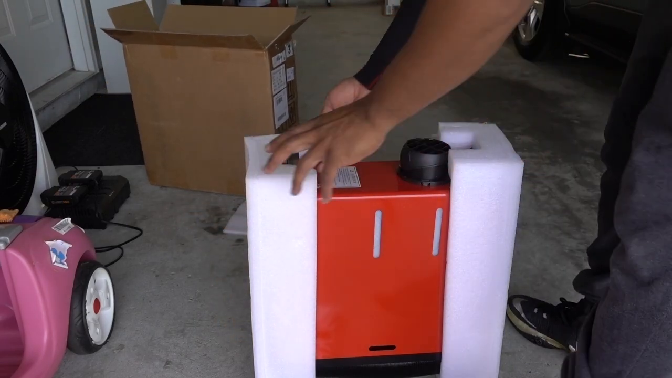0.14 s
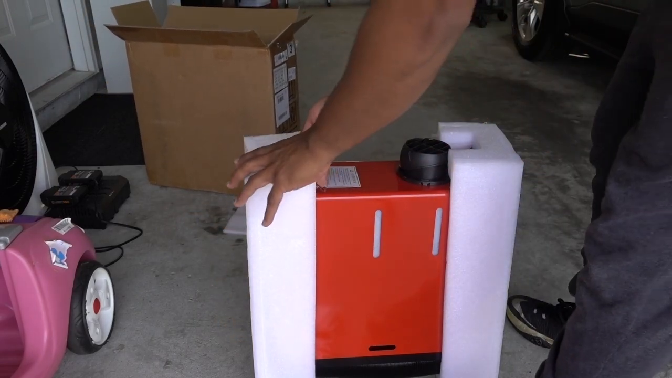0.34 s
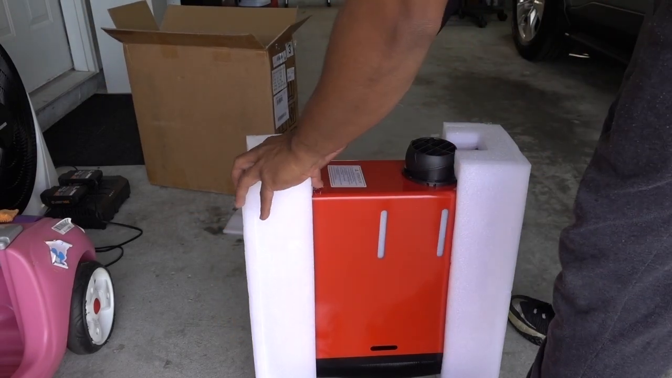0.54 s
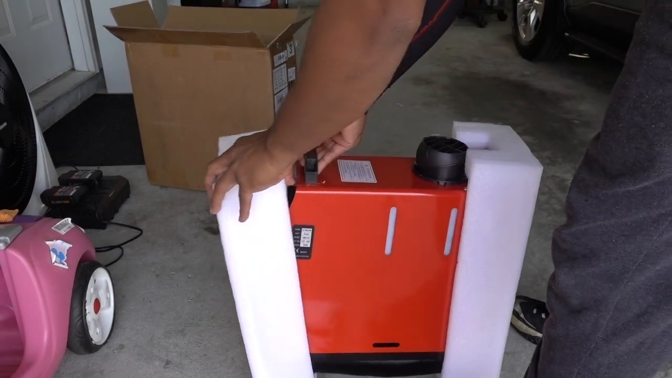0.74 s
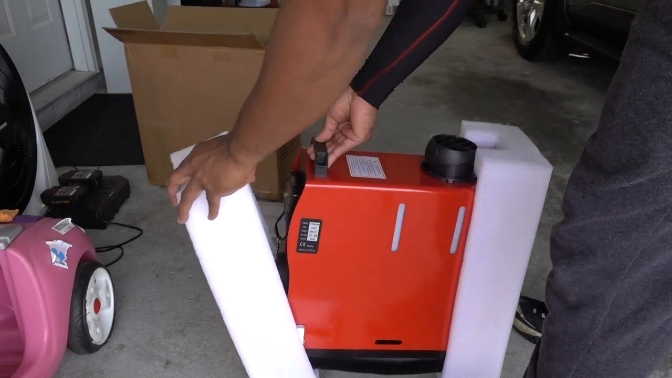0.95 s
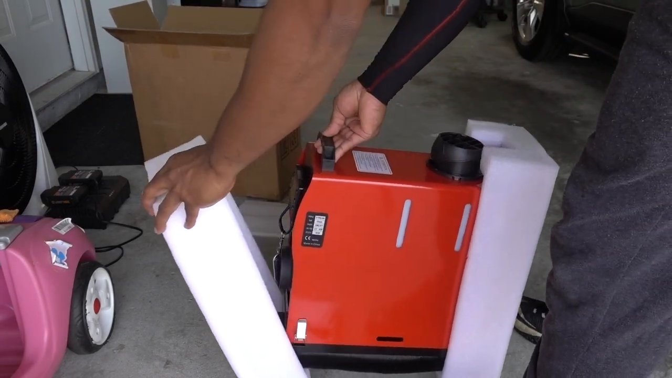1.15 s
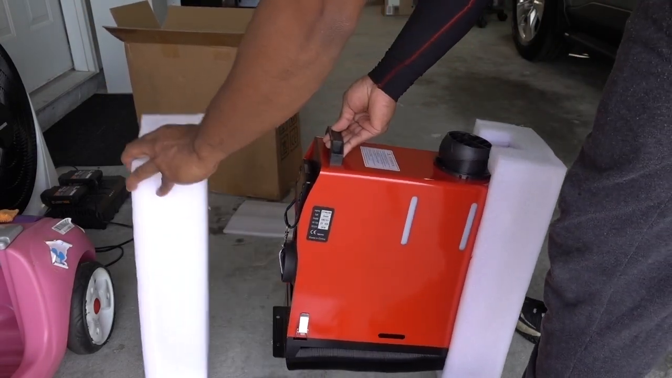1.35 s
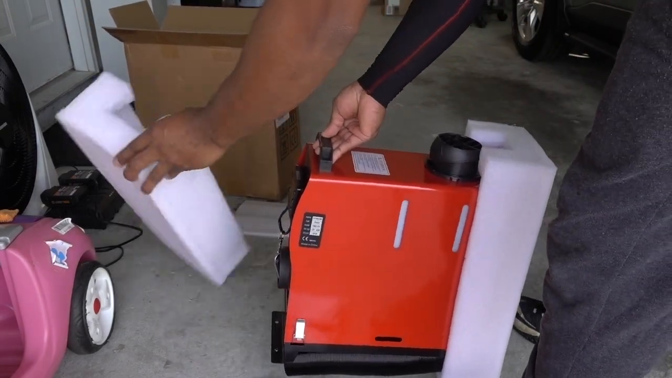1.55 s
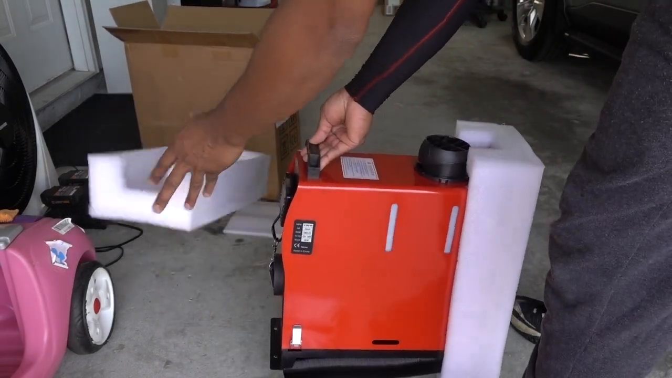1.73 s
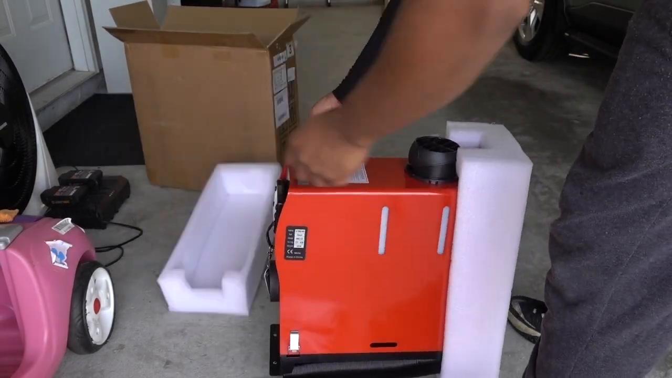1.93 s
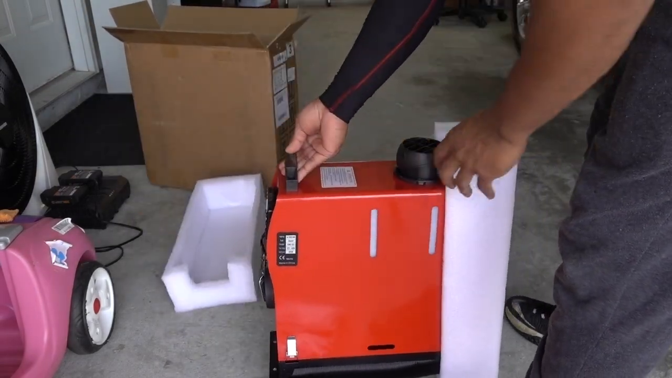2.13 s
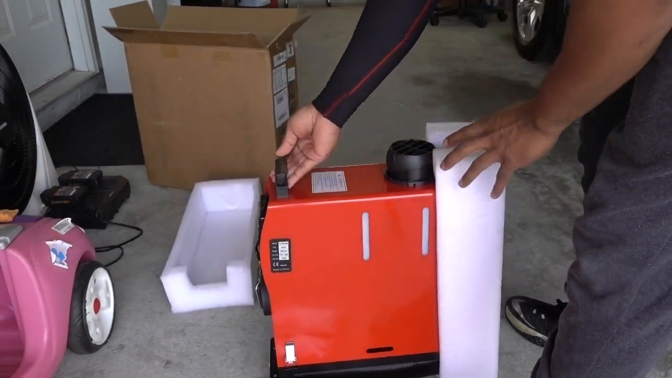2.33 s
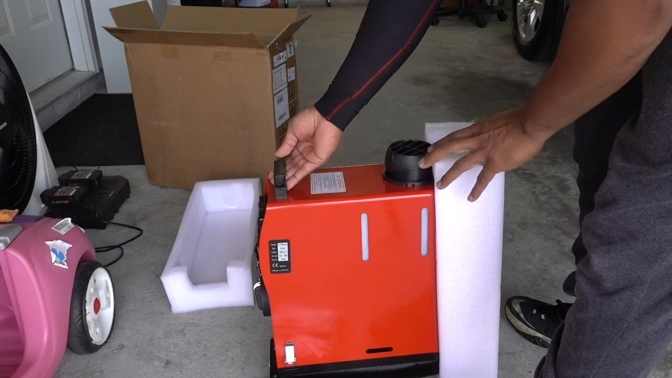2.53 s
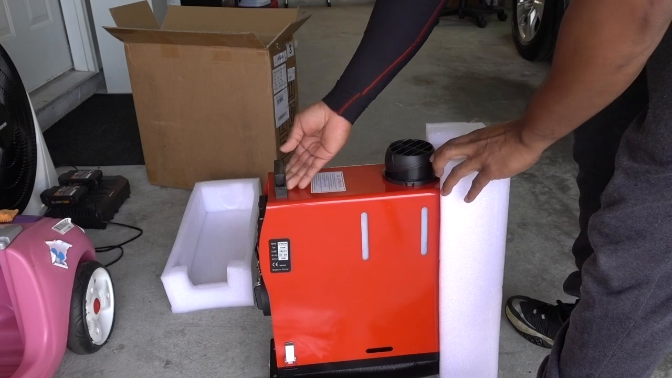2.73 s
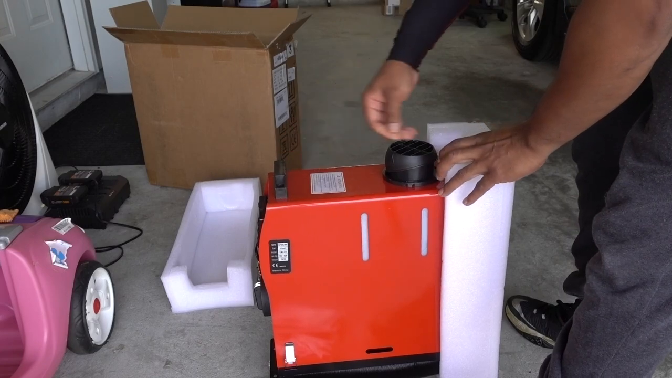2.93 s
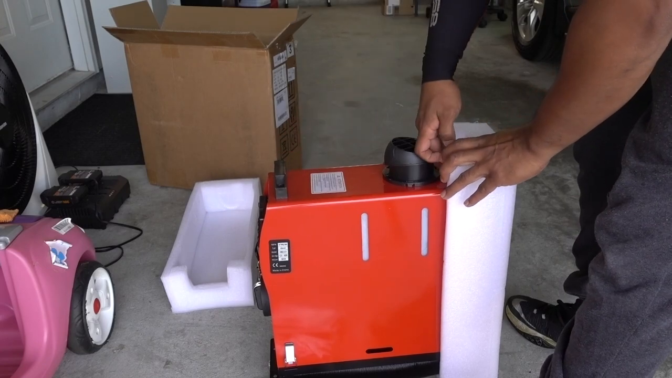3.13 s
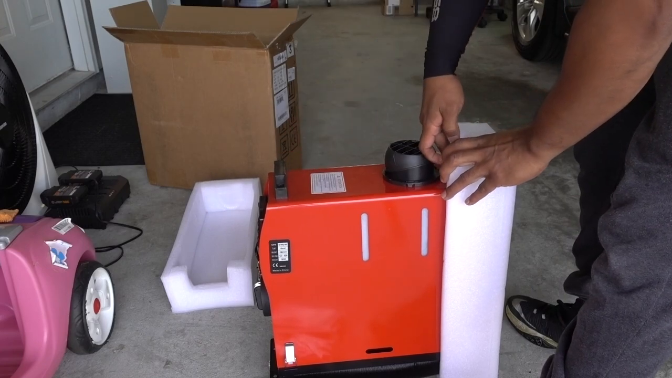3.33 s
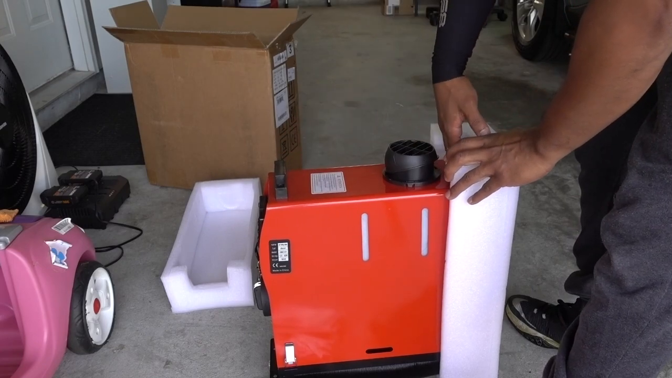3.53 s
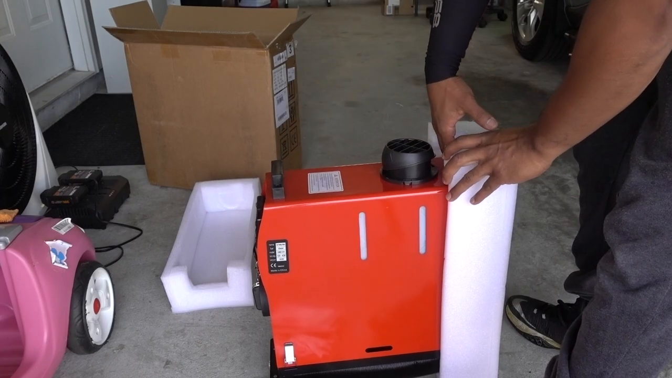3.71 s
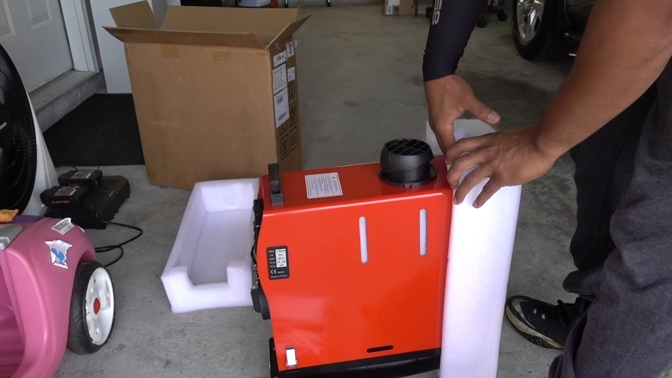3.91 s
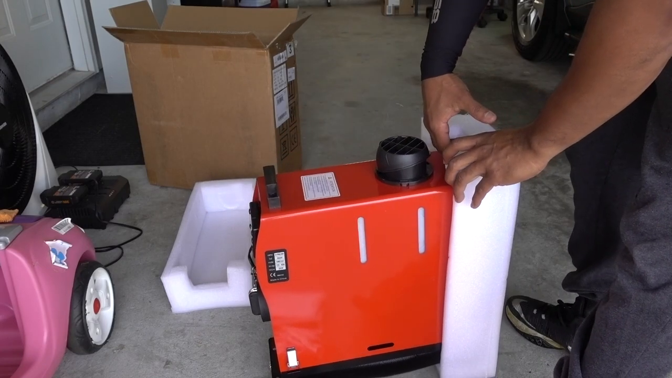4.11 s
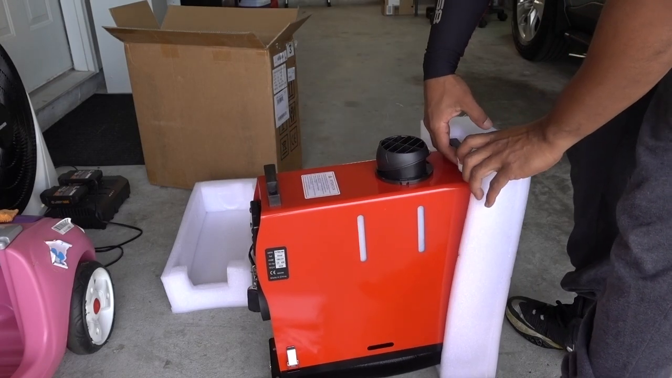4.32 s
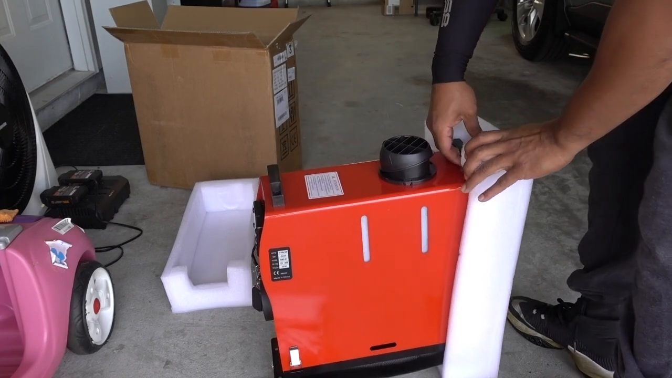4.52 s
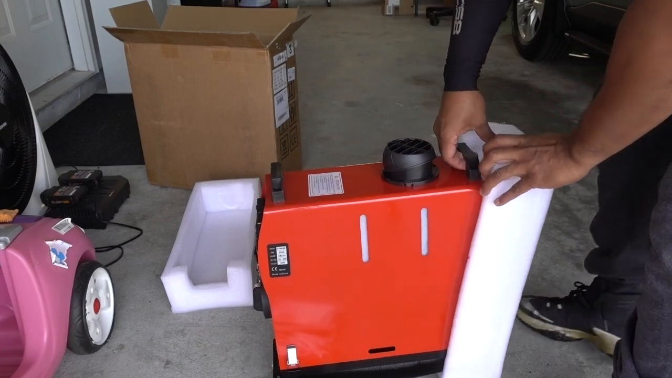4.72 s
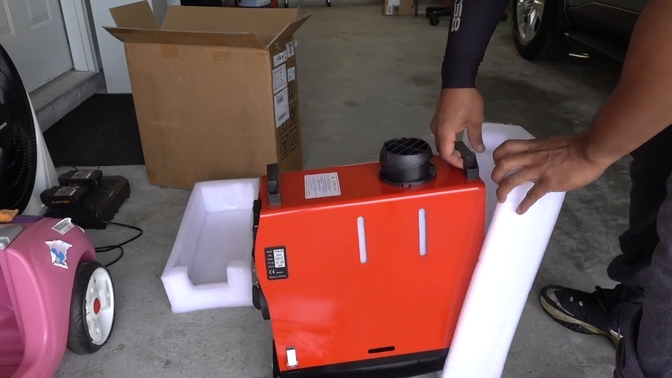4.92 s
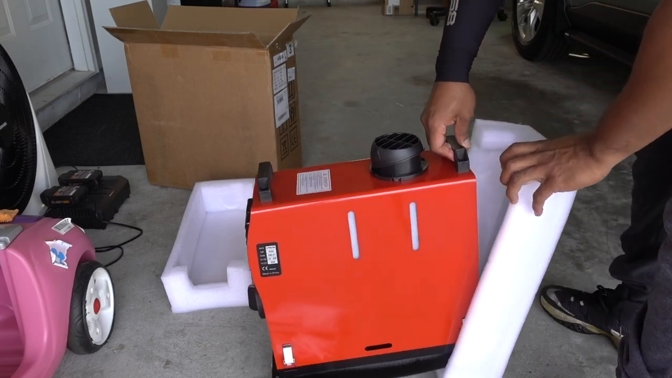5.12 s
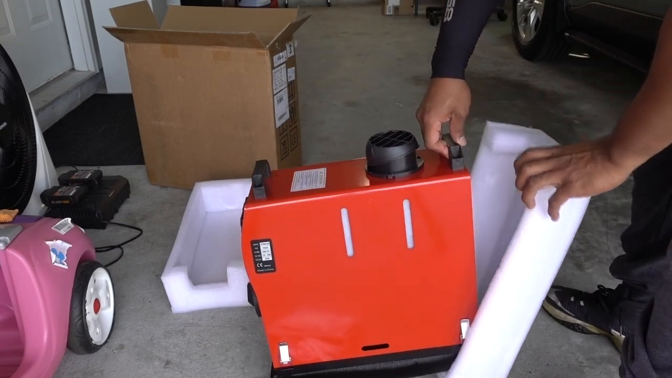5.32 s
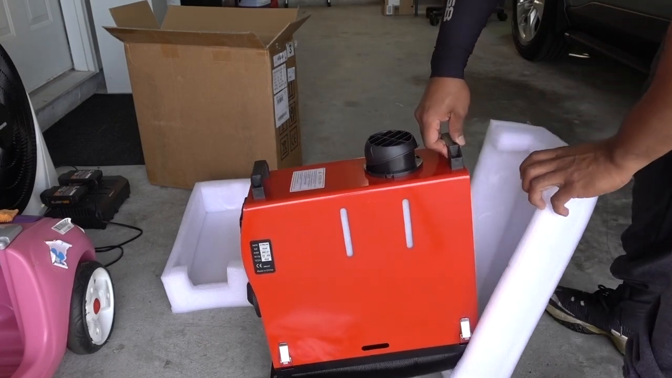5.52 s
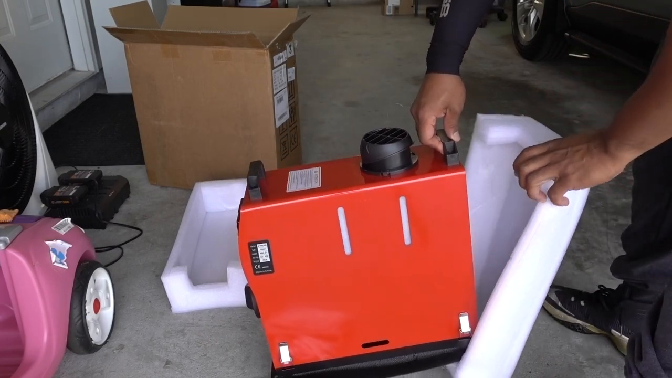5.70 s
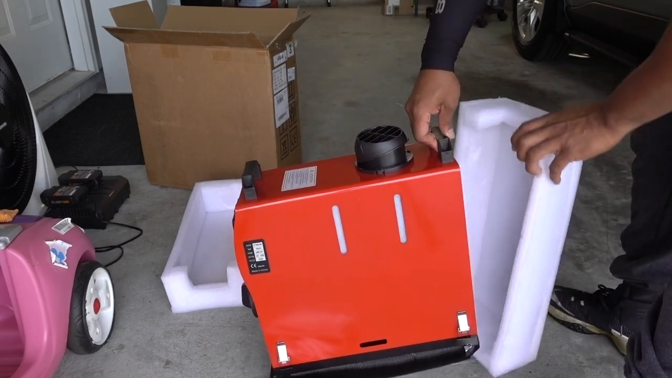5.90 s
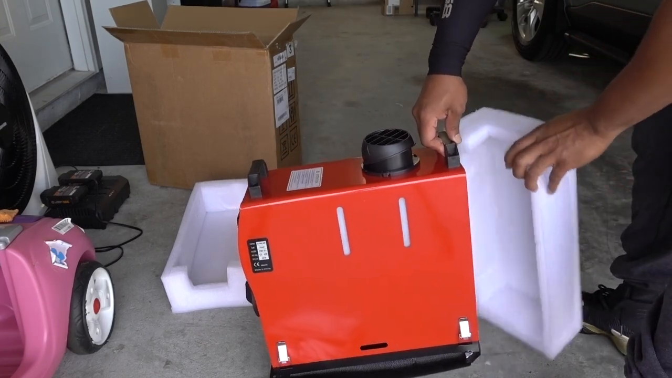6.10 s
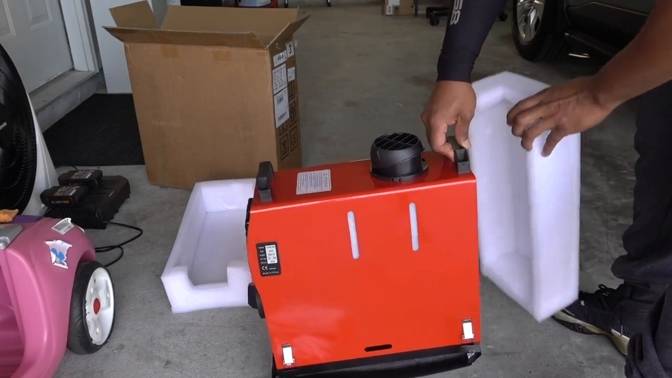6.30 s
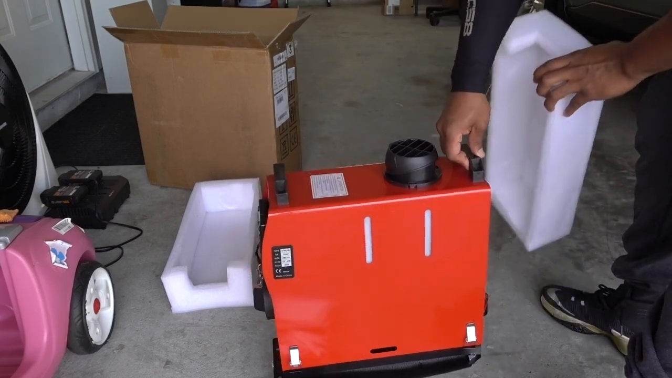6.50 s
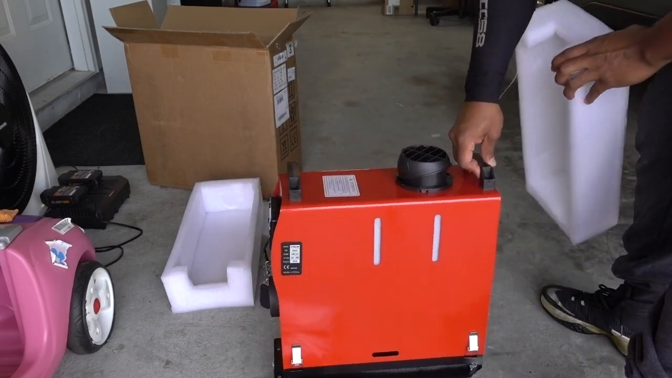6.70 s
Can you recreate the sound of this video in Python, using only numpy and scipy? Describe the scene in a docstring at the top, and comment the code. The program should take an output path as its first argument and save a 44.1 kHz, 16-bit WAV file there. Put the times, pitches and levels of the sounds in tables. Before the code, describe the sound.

Foam blocks are pulled off a sheet-metal casing, close to a stereo microphone. Faint rubs and taps open the sound. From about 0.7 to 1.3 seconds come loud, grainy, slightly squeaky scrapes, with the sharpest bump near 0.9. After a lull with one small scuff, knocks at 2 seconds make the casing ring briefly, and a loose fitting clacks near 2.4. Duller rubs and bumps follow from 3.1 to 3.5 seconds, then soft hissing friction and tiny ticks. Stronger scrapes return between 4.5 and 4.9 seconds. From 5 to 6.4 seconds the foam scuffs and knocks in a quick, uneven run, strongest around 6.1, ending with a small squeak and fading rubs. The hard-walled garage adds very short reflections, and a quiet, steady air rumble lies underneath throughout.

```python
"""Foam blocks off a metal casing

On a concrete garage floor, close to a stereo microphone, two foam blocks are worked off the ends of
a sheet-metal casing. The foam rubs in short grainy strokes that sound in its own dull body, hiss on
the paint and now and then squeak. Slips and bumps jolt the casing, which rings briefly, and a loose
fitting clacks. A hard room and a quiet air rumble lie behind."""
import sys
import numpy as np
from scipy import signal
from scipy.fft import rfft, irfft, next_fast_len
from scipy.io import wavfile

SR = 44100
rng = np.random.default_rng(int(sys.argv[2]) if len(sys.argv) > 2 else 0)


def store_wav(level_fs):
    """Save 16-bit WAV to argv[1]."""
    pcm = np.round(np.clip(np.atleast_2d(level_fs), -1, 1) * 32767)
    wavfile.write(sys.argv[1], SR, pcm.T.astype(np.int16))


N = 297675

# Rubbing strokes: peak_s, body_db, swell_s, fade_s, hiss_db, drum_db, pitch_hz, pitch_lift_db
# Swell and fade span 20 dB and last at least 22 and 4 ms; hiss and drum are relative to the body.
STROKES = [(0.002, -38.5, -0.5, 0.13, -7, -32, 2550, 38), (.455, -68.5, 0.24, -0.1, -11, 3.5, 1790, 2),
           (.5, -65, 0, -0.8, 6.5, -17, 2100, 1), (.535, -49.5, 0.16, 0.3, -4.5, -16, 2060, 7),
           (.63, -59, -0.2, 0.84, -9, -25, 2550, 15), (0.731, -33, 0.07, 0.1, -5.5, -31, 2260, 15.5),
           (0.773, -34.5, 0.037, -0.0863, 4.5, -17, 2580, -3), (0.807, -35, 0.03, -0.01, 4.5, -14, 2290, 1),
           (0.85, -40, 0.03, 0.09, 2.5, -21, 2630, 7),
           (0.893, -26.5, 0.0359, 0.2164, -11.5, -22.5, 1490, 3.5),
           (1.036, -45.5, 0.46, 0.1, -35, -35, 940, 54), (1.134, -41.5, 0.15, 0.11, -34, -45, 950, 8),
           (1.187, -36, -0.01, 0.14, -17.5, -16, 2430, 2),
           (1.22, -24.5, -0.04, 0.1254, -7.5, -27, 2000, 9.5),
           (1.264, -28.5, -0.03, 0.1017, -9.5, -28, 1900, 3.5),
           (1.69, -37.5, -0.05, 0.04, -3, -28, 2030, 8),
           (2.004, -33.5, -0.0033, -0.0139, -1.5, -26, 2360, 11),
           (2.035, -31, 0.01, 0.1355, -11.5, -13.5, 1750, 6.5),
           (2.147, -40.5, -0.02, 0.12, -41, -5.5, 1770, 14), (2.226, -50, -0.3, 0.3, -15, -20, 1730, 0),
           (2.384, -38.5, -0.0447, 0.1948, -40, -12, 1550, 6.5),
           (2.446, -44, -0.02, 0.1347, -10, -4, 1380, 12), (2.75, -58.5, 0.1, 0.1, -8.5, -8, 1480, 9),
           (2.95, -67, -0.19, 0, 11.5, -18, 1200, 12), (3.03, -59.5, 0.2, 0.5, -17, -23, 1100, 17.5),
           (3.078, -56, 0, -0.18, 1, -14.5, 2010, 24), (3.118, -33.5, 0.0078, 0.11, -29, -8, 1000, 4),
           (3.26, -25.5, 0.0139, 0.1, -18.5, -10.5, 980, 2), (3.387, -34.5, 0, 0.06, -40, -18, 1330, 7),
           (3.463, -39, -0.01, 0.1, -22, -27.5, 2340, 22), (3.548, -56, 0.2, 0.1, -29, -9, 1150, 4),
           (3.64, -69.5, 0.84, 0.4, 8, -6, 2800, 5), (3.85, -60.5, 0.5, 0.3, -4.5, -16.5, 1910, 11),
           (4.03, -54, 0.08, 0.32, -5.5, -9, 1500, 3), (4.27, -69.5, -0.2, 0.5, 10, -13.5, 2200, 3.5),
           (4.385, -53, 0.01, -0.3, 11.5, -12, 3080, 9), (4.496, -58, 0.11, -0.02, -16, 0.5, 1880, 22),
           (4.534, -29.5, 0.0118, 0.14, -13.5, -25, 2300, 4),
           (4.738, -28.5, 0.0471, 0.1235, -8.5, -23, 1770, 2),
           (4.786, -36.5, 0.0036, 0.0553, -8, -18, 2630, 9.5),
           (4.858, -42.5, 0.1, 0.06, -15, -29, 2430, 12), (4.96, -57, -0.3, 1, -1.5, -22, 1720, 5),
           (5.063, -47, 0.1, 0.03, -19, -19, 1480, 8), (5.15, -56, 0.46, 1.7, -8, -12.5, 1500, 3),
           (5.205, -38, 0.03, 0.04, -12, -26, 1570, 9), (5.29, -50, 0.1, 0.28, -10, -20, 1410, 3),
           (5.401, -32.5, 0.004, 0.09, -14, -27, 1630, -2.5), (5.54, -50, 0.3, 0.24, -8.5, -13, 1090, 9),
           (5.593, -55, 0.2, 0.4, -13, -22, 1610, 4), (5.816, -34.5, 0.0153, 0.12, -13, -14, 1620, 6.5),
           (5.9, -45.5, 0.2, 0.18, -13, -25.5, 1320, 8), (6.013, -42, 0.05, 0.17, -22, -17, 1560, 15.5),
           (6.098, -28, -0.0081, 0.07, -14, -23, 1610, 3.5), (6.145, -36, 0.09, 0.06, 1.5, -27.5, 1720, 8),
           (6.27, -46.5, 0.37, 0.16, -10, -47, 2750, 1), (6.324, -45.5, 0.08, 0.22, -27, -15, 1320, 13.5),
           (6.491, -63.5, 0.1, 0.1, 7.5, -23, 2010, 12), (6.56, -67.5, -2, 0.5, -9, -20, 1510, 10),
           (6.661, -67, -0.37, 0.14, 7, -1, 1600, 7), (6.71, -59, -0.1, -0.8, -21, 2, 547, -2)]
# Slips and bumps: start_s, level_db, pitch_hz, width_over_pitch, t60_s, crackle_db, thud_db
# Crackle and thud are relative to the level.
BUMPS = [(0.245, -44.5, 1240, 2, 0.036, -12, 12), (0.308, -42.5, 1450, 0.48, 0.042, -49.5, -1),
         (0.413, -41.5, 2400, 0.42, 0.03, -38, -21), (0.421, -42, 2000, 0.31, 0.04, -38, -20),
         (0.526, -36.5, 1860, 1.1, 0.11, -10, -5.5), (0.762, -45, 3300, 1.3, 0.22, 20, -30),
         (0.795, -37.5, 3300, 0.91, 0.047, 7, -31.5), (0.881, -12.5, 1640, 0.84, 0.086, -9, -41),
         (1.019, -34, 760, 0.42, 0.17, -30.5, -40.5), (1.118, -36, 1100, 3.1, 0.1, -2, -35),
         (1.127, -34.5, 1090, 2.4, 0.043, -25.5, -37), (1.168, -30.5, 2680, 0.23, 0.03, -13, -14),
         (1.211, -21.5, 1750, 1.77, 0.11, -5.5, -33), (1.223, -27, 1480, 1.1, 0.036, -21, -36),
         (1.235, -22, 1460, 0.52, 0.034, -10, -26), (1.26, -23.5, 1550, 0.54, 0.1, -3.5, -22),
         (1.341, -37.5, 1960, 1.1, 0.041, -5, -27), (1.646, -51.5, 2000, 1.3, 0.18, -3, -9),
         (1.670, -39, 2730, 0.4, 0.036, 2, -30), (1.986, -33, 2380, 1.5, 0.33, -2, -18),
         (2.021, -26.5, 1320, 1.6, 0.066, -34, -7), (2.104, -27.5, 1690, 1.2, 0.11, -12.5, -3.5),
         (2.216, -34.5, 1800, 1.16, 0.15, -11.5, -20), (2.266, -43.5, 1760, 0.28, 0.13, -0.5, 0),
         (2.369, -27.5, 1740, 0.57, 0.089, -30, -13), (2.417, -23, 2010, 0.31, 0.021, -24, -32),
         (2.423, -31, 1900, 0.24, 0.22, -20, -32), (2.431, -35.5, 690, 0.92, 0.089, -9, 7),
         (2.578, -40, 1900, 0.4, 0.088, -20, -1), (3.099, -34.5, 705, 0.88, 0.13, -13, -5),
         (3.227, -34.5, 1210, 1.1, 0.26, -0.5, -35.5), (3.236, -24.5, 1490, 2.34, 0.15, -15, -19.5),
         (3.351, -31.5, 1180, 2.5, 0.097, -8.5, -39), (3.397, -31.5, 2400, 0.37, 0.053, -14, -21),
         (3.451, -43.5, 2260, 0.54, 0.16, 6.5, -41), (3.51, -39.5, 677, 0.61, 0.15, -54, -16),
         (3.678, -42.5, 2810, 0.24, 0.16, -3.5, -23), (3.688, -28, 2920, 0.43, 0.015, -13, -31),
         (4.016, -54.5, 2000, 1, 0.026, 12, -13), (4.052, -38, 2280, 0.27, 0.049, -11, -3.5),
         (4.143, -51.5, 1500, 1.5, 0.09, -21, -3), (4.349, -49, 3370, 0.51, 0.056, 7.5, -9),
         (4.361, -45, 3400, 0.19, 0.045, 10, -12), (4.39, -52.5, 3400, 0.61, 0.051, 17, -14),
         (4.503, -36, 1510, 1, 0.14, -14, -5), (4.52, -30, 2070, 0.47, 0.27, 0.5, -9.5),
         (4.527, -29, 2100, 0.49, 0.039, -15, -18), (4.543, -25.5, 2050, 0.6, 0.074, -13, -11),
         (4.69, -38.5, 1850, 1.5, 0.24, -34, -30), (4.717, -27.5, 1320, 1.8, 0.13, -13, -36),
         (4.847, -36.5, 2200, 1.44, 0.23, -4.5, -44), (5.06, -42.5, 1420, 0.35, 0.096, -13, -27),
         (5.134, -53, 410, 0.7, 0.071, -29.5, -5), (5.189, -40.5, 2520, 1.3, 0.12, -2.5, -37),
         (5.21, -37, 1990, 1.7, 0.052, -24, -24), (5.273, -38.5, 1210, 1, 0.12, -8, -18),
         (5.353, -42.5, 401, 0.28, 0.17, -37, -16), (5.371, -36, 550, 1.2, 0.13, -1.5, -22),
         (5.391, -30, 1540, 0.41, 0.089, -0.5, -34), (5.437, -32, 1470, 0.26, 0.038, -9, -24),
         (5.516, -38.5, 930, 0.35, 0.035, -18, -5), (5.589, -37, 1800, 0.51, 0.051, -23, -21),
         (5.602, -49, 327, 0.7, 0.035, -31.5, -6), (5.659, -34, 1860, 0.57, .03, -24, -22),
         (5.662, -37, 1590, 0.83, 0.13, -29, -18), (5.715, -42.5, 1800, .3, 0.033, -21.5, -18),
         (5.764, -36.5, 1730, 0.93, 0.24, -6, -10), (5.802, -29, 970, 2.1, 0.12, -6.5, -22.5),
         (5.944, -37, 614, 0.92, 0.2, -8, -8), (5.988, -27, 1890, 0.92, 0.025, -21, -44),
         (5.994, -33.5, 1630, 1.3, 0.052, -19.5, -26), (6.079, -37, 1680, 1.5, 0.12, 13.5, -48),
         (6.095, -22.5, 1500, 1, 0.058, -15, -28), (6.114, -27, 1510, 1.3, 0.043, -14, -25),
         (6.124, -43.5, 165, 0.53, 0.18, -32, -10), (6.248, -37.5, 3220, 0.43, 0.17, -8, -37),
         (6.288, -40, 620, 0.42, 0.11, -31.5, -16), (6.315, -34, 1420, 0.75, 0.087, -32, -14.5),
         (6.361, -31, 1700, 0.48, 0.12, -40, -36.5), (6.469, -50.5, 3200, 0.29, 0.084, 11, -29)]
# Brief rough tones (foam squeaks, panel hums, the fitting's high ping and pitched ticks):
# start_s, end_s, start_hz, end_hz, level_db, width_hz
ROUGH_TONES = [(0.568, 0.774, 3100, 3110, -57, 400), (0.838, 0.892, 5600, 5600, -45.5, 800),
               (0.879, 0.943, 601, 582, -36.5, 73.5), (1.024, 1.155, 884, 805, -54.5, 200),
               (1.629, 1.638, 2850, 2850, -62, 300), (2.045, 2.088, 170, 160, -58, 50),
               (2.102, 2.154, 394, 392, -45, 40), (2.124, 2.15, 10100, 9900, -61, 500),
               (2.261, 2.313, 4980, 5000, -63, 200), (2.366, 2.378, 7330, 7270, -48, 300),
               (2.377, 2.405, 7200, 7350, -59, 500), (2.431, 2.452, 9860, 9700, -53.5, 500),
               (2.432, 2.472, 297, 297, -40.5, 51), (3.099, 3.146, 313, 300, -44.5, 50),
               (3.244, 3.301, 403, 395, -33, 39), (3.349, 3.363, 6770, 6600, -49, 900),
               (3.39, 3.407, 7200, 8200, -61, 700), (3.573, 3.666, 6460, 6100, -60, 1400),
               (4.014, 4.021, 10200, 10200, -52, 900), (4.076, 4.082, 10800, 10600, -57, 1200),
               (4.359, 4.366, 7520, 6960, -43, 1600), (4.428, 4.5, 2320, 2320, -59, 200),
               (5.265, 5.335, 3004, 4070, -50, 800), (6.244, 6.301, 3280, 3850, -53, 500),
               (6.357, 6.448, 1401, 1552, -44.5, 242), (6.468, 6.51, 6950, 6900, -56, 500),
               (6.47, 6.51, 11100, 10700, -58, 900), (6.634, 6.67, 6870, 6800, -60.5, 870)]
# The loose fitting hitting the casing: start_s, level_db
CLACKS = [(2.369, -26.5), (2.374, -30.5), (2.418, -37.5), (2.58, -54.5)]
# Ringing modes of the casing and of the fitting: pitch_hz, level_db, t60_s
CASING_MODES = [(312.6, 1, 0.081), (393.5, -5.5, 0.23), (591.5, -9.5, 0.05), (791, -21, 0.064),
                (876, -4.5, 0.05), (1029, -1.5, 0.037), (1143, -3.5, 0.066), (1364, -15, 0.15),
                (1413, -4, 0.15), (1786, -5.5, 0.11), (1910, -12.5, 0.58), (2326, -6.5, 0.084),
                (2880, -31, 0.14), (3080, -5.5, 0.068), (4360, -44, 0.23), (6600, -7.5, 0.025),
                (7070, -18, 0.078)]
FITTING_MODES = [(648, -12.5, 0.099), (927.4, -8, 0.25), (1350, -7, 0.049), (1770, -10.5, 0.12),
                 (1900, -9, 0.14), (2200, -1, 0.048), (2590, -33, .1), (3040, -10.5, .1)]
# Spectra of the foam body, the paint hiss, the drumming panels and the air: frequency_hz, level_db
FOAM_SPECTRUM = [(260, -54), (450, -15), (713, 3.5), (1100, -0.5), (1410, 0.5), (1990, -1), (2280, 0.5),
                 (3300, -2), (4400, -15), (5500, -12), (7150, -87), (12100, -120)]
HISS_SPECTRUM = [(2530, 17), (4300, -4), (5100, 0), (6110, -1), (7130, -1), (12400, -1), (15100, 0),
                 (16000, -46)]
DRUM_SPECTRUM = [(53, -73), (90, -54), (150, -21), (200, -18), (246, -8), (330, -8.5), (387, -3), (476, -2),
                 (700, -4), (910, -16), (1540, -120)]
AIR_SPECTRUM = [(18, -82.5), (30, -36), (130, -19.5), (273, -6), (345, -4), (540, -11.5), (702, -9),
                (1860, -10), (2610, -9), (4530, -19.5), (6900, -15.5), (7870, -21.5), (13000, -28.5),
                (16000, -36)]
# Moving centre of the treble in hiss and crackle: time_s, centre_hz
TREBLE_CENTRE = [(0.0, 5200), (.15, 5200), (.5, 6350), (.62, 5730), (0.69, 7800), (1.07, 5500),
                 (1.09, 10300), (1.47, 5540), (1.73, 9600), (1.78, 5900), (1.98, 10200), (2.14, 9800),
                 (2.58, 4800), (3.06, 10000), (3.11, 6400), (3.22, 7440), (3.52, 9700), (3.55, 5600),
                 (3.95, 6500), (3.99, 10300), (4.17, 8000), (4.4, 9700), (4.8, 8000), (4.91, 5030),
                 (4.98, 7300), (5.3, 4580), (5.34, 6860), (5.7, 6440), (5.79, 8100), (6.08, 6850),
                 (6.22, 5940), (6.49, 8500), (6.75, 5900)]
# Stereo width at the microphone, for near sounds and for the air: frequency_hz, side_gain_db
NEAR_WIDTH = [(60, -3), (110, -20), (200, -42), (380, -24), (700, -15.5), (1290, -11), (2380, -11),
              (4400, 1.5), (8120, -1), (15000, -1)]
AIR_WIDTH = [(60, -2), (110, -24), (200, -28), (380, -16), (700, -9.5), (1290, -4), (2380, -5.5),
             (4400, 3.5), (8120, 2), (15000, -4)]

HISS_LEAD_S, DRUM_LAG_S = 0.0011, 0.0016   # the surface slips before the body sounds; the panels follow
RUB_RING_DB, BUMP_RING_DB = -1.5, 10.5   # how strongly rubbing and bumps ring the sheet metal
ROOM_T60_S, ROOM_DB, WALL_CUT_HZ = 0.11, -13.5, 9300
AIR_DB = -65.5


def rubbing():
    """Grains sound in the foam near the loudest stroke's pitch, hiss on the paint and drum the panels."""
    t = np.arange(N) / SR
    coarse_t = t[::128]
    peak_s, db, swell_s, fade_s, hiss_db, drum_db, pitch_hz, lift_db = np.array(STROKES).T[:, :, None]
    timing = peak_s, swell_s, fade_s
    body_power = stroke_power(coarse_t, *timing, db, roundness=1.41)
    hiss_power = stroke_power(coarse_t + HISS_LEAD_S, *timing, db + hiss_db, roundness=1.36)
    drum_power = stroke_power(coarse_t - DRUM_LAG_S, *timing, db + drum_db, roundness=1.06)
    body, hiss, drum = (np.interp(t, coarse_t, np.sqrt(power.sum(axis=0)))
                        for power in (body_power, hiss_power, drum_power))
    share = body_power / body_power.sum(axis=0)
    pitch_hz = np.interp(t, coarse_t, np.sum(share * pitch_hz, axis=0))
    lift_db = np.interp(t, coarse_t, np.sum(share * lift_db, axis=0))
    treble_hz = np.interp(t, *np.transpose(TREBLE_CENTRE))
    grip = judder(rate_hz=60, depth_db=0.8)
    foam = colour(grains(per_s=3950, spread_db=2.5), FOAM_SPECTRUM)
    foam = lift_bands(foam, pitch_hz, lift_db, low_hz=452.5, count=10, octaves=0.85, flare_db=2.28)
    paint = colour(grains(per_s=7040, spread_db=1.6), HISS_SPECTRUM)
    paint = lift_bands(paint, treble_hz, lift_db=9.6, low_hz=4244, count=6, octaves=0.97, flare_db=1.46)
    rubbed = grip * (body * foam + hiss * paint) + drum * noise(DRUM_SPECTRUM)
    hum = sum(from_db(RUB_RING_DB + mode_db) * casing_ring(rubbed, hz, t60_s)
              for hz, mode_db, t60_s in CASING_MODES)
    return rubbed + hum


def stroke_power(t, peak_s, swell_s, fade_s, level_db, roundness):
    """Each stroke swells and fades: roundness 1 is pointed with long skirts, 2 is round and stops short."""
    before = (peak_s - t) / np.maximum(swell_s, 0.022)
    after = (t - peak_s) / np.maximum(fade_s, 0.004)
    from_peak = np.where(t < peak_s, before, after)
    return from_db(level_db - 20 * from_peak ** roundness) ** 2 + 1e-30


def grains(per_s, spread_db):
    """Foam cells of uneven size catch and let go at random; rms 1."""
    sizes = from_db(spread_db * np.minimum(rng.exponential(1, N), 5))
    signs = rng.choice([-1, 1], N)
    releases = np.clip((per_s / SR - rng.random(N)) * 200, 0, 1)
    return rms_one(sizes * signs * releases)


def judder(rate_hz, depth_db):
    """The grip on the surface wavers quickly: a gain around 1."""
    waver = smooth(rng.standard_normal(N), rate_hz)
    return from_db(depth_db * np.tanh(rms_one(waver)))


def lift_bands(x, pitch_hz, lift_db, low_hz, count, octaves, flare_db):
    """Third-octave bands flare one by one, those near a moving pitch lifted; the level is evened out."""
    out, power = 0, 0
    edges_hz = low_hz * 2 ** (np.arange(count + 1) / 3)
    for low, high in zip(edges_hz, edges_hz[1:]):
        band = signal.sosfilt(signal.butter(2, [low, high], "band", fs=SR, output="sos"), x)
        octaves_away = np.log2(pitch_hz / np.sqrt(low * high))
        lift = from_db(lift_db * np.exp(-(octaves_away / octaves) ** 2))
        out += lift * band * judder(rate_hz=19.6, depth_db=flare_db)
        power += lift ** 2 * np.mean(band ** 2)
    return out / np.sqrt(power)


def bumps():
    """Each bump is a dying burst of foam grains with crackle and thud, which shakes the casing."""
    out, size = np.zeros(N + SR), SR // 3
    t = np.arange(size) / SR
    lead = 44   # samples: the swell starts a millisecond before the first contact
    contact = 10.6 * (np.arange(size) == lead)   # in multiples of the grain rms
    rise_share, thud_rise_s = 0.027, 0.007   # a bump swells in this share of its t60
    crest_db = 7.5   # grain peaks stand above the rms of a burst
    cells = grains(per_s=14000, spread_db=2)
    crackles = colour(grains(per_s=10000, spread_db=2.5), HISS_SPECTRUM)
    thuds = noise(DRUM_SPECTRUM)
    chance = rng.normal(0, 1, (len(BUMPS), 2, len(CASING_MODES)))
    for bump, (strengths, detunes) in zip(BUMPS, chance):
        start_s, level_db, pitch_hz, width, t60_s, crackle_db, thud_db = bump
        at = min(round(start_s * SR), N - size)
        foam = cells[at:at + size] + contact
        for _ in range(3):   # the block passes only a band round its pitch
            foam = resonance(foam, pitch_hz, width * pitch_hz)
        treble_hz = np.interp(start_s, *np.transpose(TREBLE_CENTRE))
        crackle = crackles[at:at + size]
        for _ in range(2):
            crackle = resonance(crackle, treble_hz, width_hz=treble_hz)
        thud = thuds[at:at + size] * (1 - np.exp(-t / thud_rise_s))
        envelope = (1 - np.exp(-t / (rise_share * t60_s))) * from_db(-60 * t / t60_s)
        burst = rms_one(foam) + from_db(crackle_db) * rms_one(crackle) + from_db(thud_db) * thud
        burst *= envelope
        shaking = burst + 1e-18
        for (hz, mode_db, mode_t60_s), strength, detune in zip(CASING_MODES, strengths, detunes):
            ring = casing_ring(shaking, hz * (1 + 0.0119 * detune), mode_t60_s)
            burst += from_db(BUMP_RING_DB + mode_db + 2 * strength) * ring
        start = round(start_s * SR) - lead
        out[start:start + size] += from_db(level_db - crest_db) * burst
    return out[:N]


def casing_ring(shaking, pitch_hz, t60_s):
    """One mode of the sheet metal takes up the shaking near its pitch and dies away."""
    return resonance(shaking, pitch_hz, width_hz=np.log(1000) / np.pi / t60_s)


def clacks():
    """The loose fitting hits the casing; each clack strikes its modes with uneven strength."""
    out, t = np.zeros(N), np.arange(SR // 3) / SR
    hz, mode_db, t60_s = np.array(FITTING_MODES).T[:, :, None]
    attack = 1 - np.exp(-t / 0.0015)
    for start_s, level_db in CLACKS:
        uneven_db = rng.normal(0, 0.75, hz.shape)
        decays = from_db(level_db + mode_db + uneven_db - 60 * t / t60_s)
        at = round(start_s * SR)
        out[at:at + len(t)] += attack * np.sum(decays * np.sin(2 * np.pi * hz * t), axis=0)
    return out


def rough_tones():
    """Foam squeaks, panel hums, the fitting's high ping and pitched ticks: glides shaken by noise."""
    out = np.zeros(N)
    for start_s, end_s, start_hz, end_hz, level_db, width_hz in ROUGH_TONES:
        at, size = round(start_s * SR), round((end_s - start_s) * SR)
        shake = smooth(rng.standard_normal((2, SR // 4)), width_hz / 2)[:, :size]
        phase = 2 * np.pi * np.cumsum(np.linspace(start_hz, end_hz, size)) / SR
        tone = rms_one(shake[0] * np.cos(phase) + shake[1] * np.sin(phase))
        envelope = np.sin(np.pi * np.linspace(0, 1, size) ** 0.6)
        out[at:at + size] += from_db(level_db) * tone * envelope
    return out


def first_reflections(near):
    """Floor and casing scatter the sound back to the microphone within 20 ms."""
    t = np.arange(SR // 50) / SR
    scatter = rng.standard_normal(len(t)) * np.exp(-t / 0.004)
    return signal.fftconvolve(near, scatter / np.sqrt(np.sum(scatter ** 2)))[:N]


def garage_walls(near):
    """Hard walls return two dense tails, mid and side, 6 ms behind the direct sound."""
    t = np.arange(SR // 2) / SR
    pole = np.exp(-2 * np.pi * WALL_CUT_HZ / SR)
    echoes = signal.lfilter([1], [1, -pole], rng.standard_normal((2, len(t))))
    tails = echoes * from_db(-60 * t / ROOM_T60_S) * (t > 0.006)
    tails /= np.sqrt(np.sum(tails ** 2) / 2)
    return signal.fftconvolve(near[None], tails, axes=1)[:, :N]


def air_rumble():
    """The garage air: quiet, steady noise all round the microphone."""
    mid, side = (from_db(AIR_DB) * noise(AIR_SPECTRUM) for _ in range(2))
    return microphone_ports(mid, side, AIR_WIDTH)


def microphone_ports(mid, side, width):
    """Two close ports hear the low notes nearly alike and the treble differently."""
    side = colour(side, width)
    return np.array([mid + side, mid - side])


def from_db(db):
    """Decibels to gain."""
    return 10 ** (np.asarray(db) / 20)


def rms_one(x):
    """Scale to rms 1."""
    return x / np.sqrt(np.mean(x ** 2) + 1e-20)


def colour(x, spectrum):
    """Filter x by a curve of frequency_hz, level_db points."""
    size = next_fast_len(N)
    hz = np.maximum(np.arange(size // 2 + 1) * SR / size, 1)
    points_hz, points_db = np.transpose(spectrum)
    gain = from_db(np.interp(np.log(hz), np.log(points_hz), points_db))
    return irfft(rfft(x, size) * gain, size)[:N]


def noise(spectrum):
    """Steady noise of the given spectrum; rms 1."""
    return rms_one(colour(rng.standard_normal(N), spectrum))


def smooth(x, corner_hz):
    """Two-pole low-pass, not scaled to unit gain."""
    r = np.exp(-2 * np.pi * corner_hz / SR)
    return signal.lfilter([1], [1, -2 * r, r * r], x)


def resonance(x, hz, width_hz):
    """Two-pole resonance, gain 1 at its peak."""
    r = np.exp(-np.pi * width_hz / SR)
    gain = (1 - r * r) / 2
    return signal.lfilter([gain, 0, -gain], [1, -2 * r * np.cos(2 * np.pi * hz / SR), r * r], x)


def scene():
    """Foam and casing close to the microphone, the garage walls and the air behind."""
    # The same sounds with fresh grains feed the side channel and widen the stereo.
    near, side_sounds = (rubbing() + bumps() + clacks() + rough_tones() for _ in range(2))
    tail_mid, tail_side = from_db(ROOM_DB) * garage_walls(near)
    side = 0.6 * first_reflections(near) + 0.8 * side_sounds + tail_side
    return microphone_ports(near + tail_mid, side, NEAR_WIDTH) + air_rumble()


def record(dry):
    """The microphone drops the bass below 140 Hz; the top is cut steeply, gone by 16.5 kHz."""
    low_cut = signal.butter(3, 140, "high", fs=SR, output="sos")
    high_cut = signal.cheby2(14, 70, 16500, fs=SR, output="sos")
    return signal.sosfilt(high_cut, signal.sosfilt(low_cut, dry))


dry = scene()
out = record(dry)
store_wav(out)
```